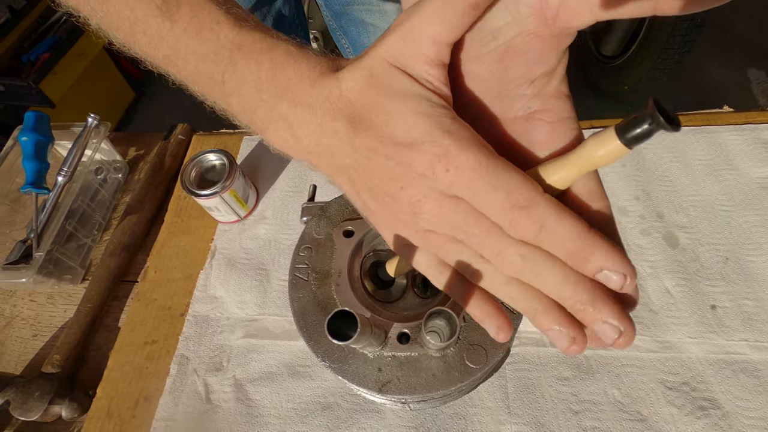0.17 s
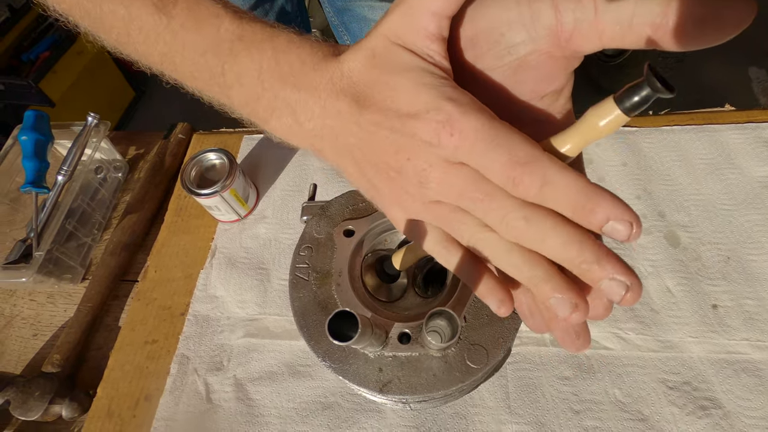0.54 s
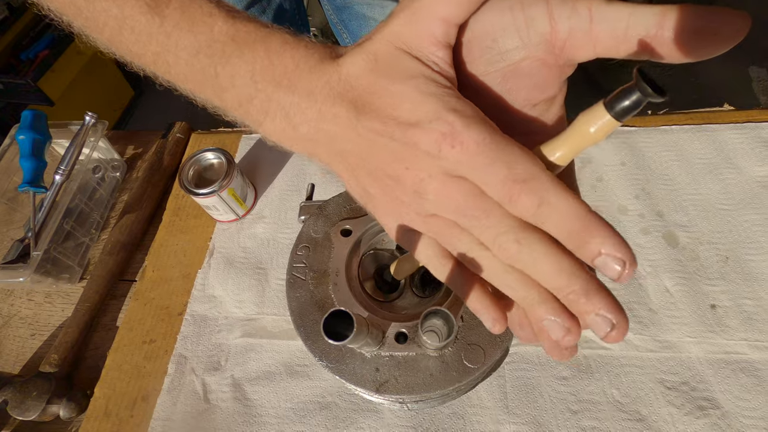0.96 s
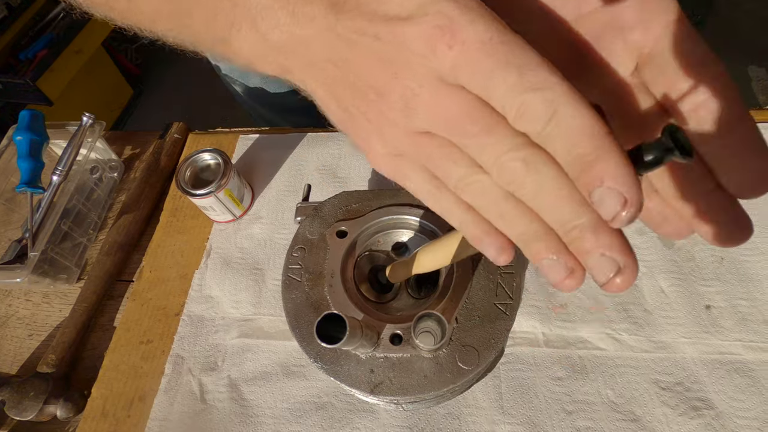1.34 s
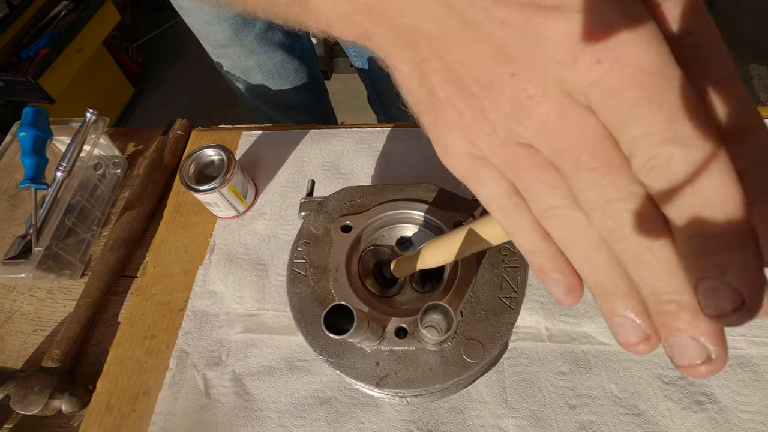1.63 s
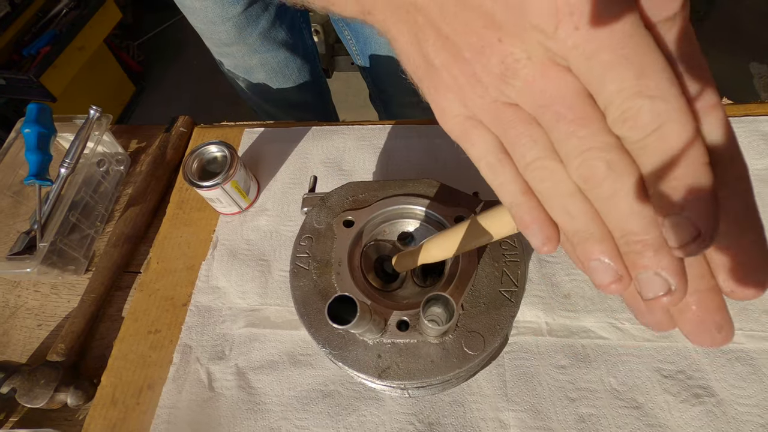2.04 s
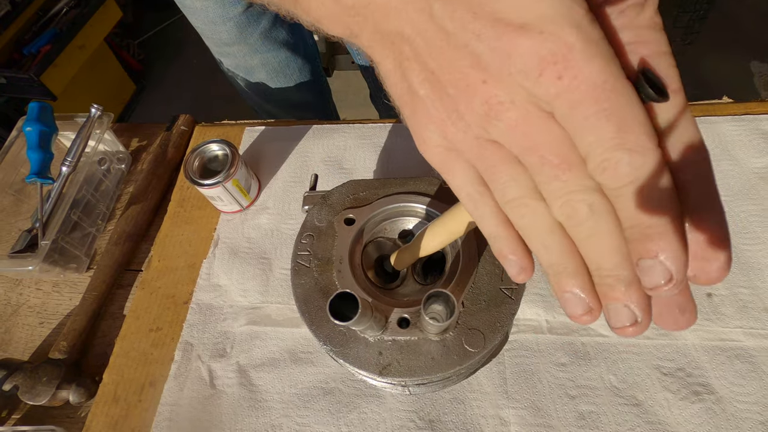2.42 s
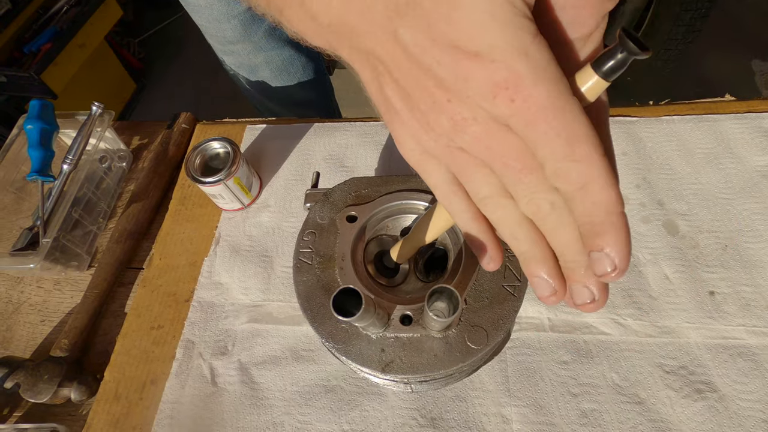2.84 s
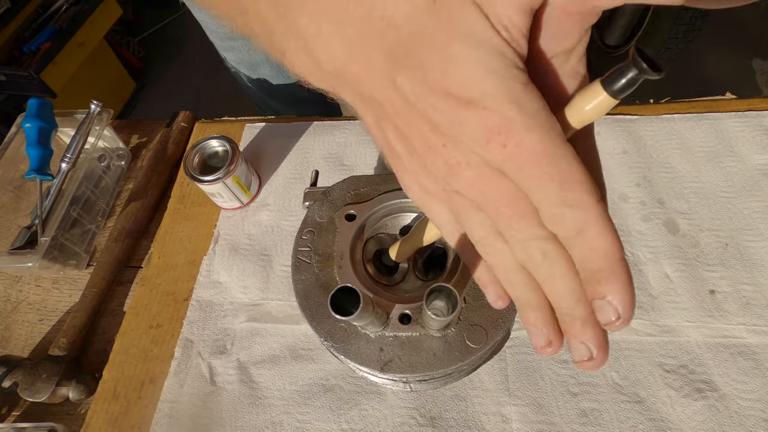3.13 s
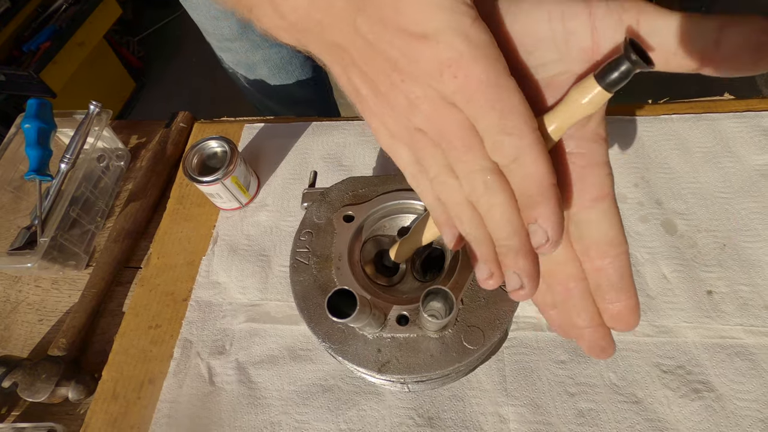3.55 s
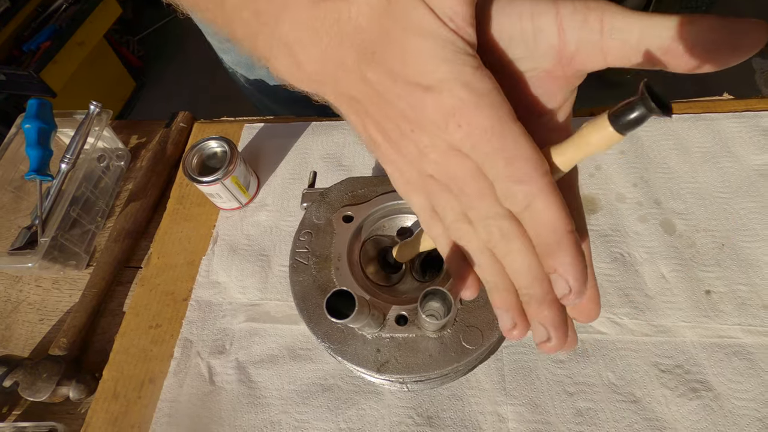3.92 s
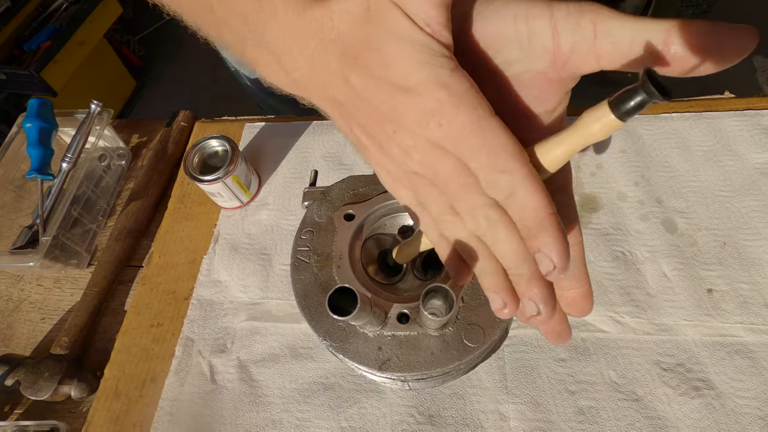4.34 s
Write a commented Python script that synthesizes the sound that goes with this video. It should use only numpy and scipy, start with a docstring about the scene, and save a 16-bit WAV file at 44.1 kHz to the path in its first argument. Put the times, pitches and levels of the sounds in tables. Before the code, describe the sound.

A valve is ground against its seat in a metal cylinder head with a wooden stick spun between two palms, heard from close above the workbench. In the first half second come three short, gritty scrapes that make the metal ring, along with a soft, dull scuff of skin on wood. From about 0.5 to 1.7 seconds the grinding pauses: stray grains tick faintly and the rubbing of the hands fades away. Near 1.8 seconds the turns resume, short and uneven at first. From about 2.6 seconds they build into louder, steady back-and-forth strokes, about seven a second, continuing to the end at around 4.5 seconds. Each stroke is a sandy rasp with a bright sizzle and a thin metallic ring, and the valve often catches with a brief, mid-pitched chatter. The workshop adds a short, dull echo and a quiet low rumble throughout.

```python
"""A wooden lapping stick, spun to and fro between two palms, grinds a valve on its seat in a cylinder head.
First come a few hesitant turns: crushed grit rasps and rings the metal, and skin scuffs the shaft.
In the pause that follows, stray grains tick as the hands shift their grip. Near 2 s the turns resume and
build to steady strokes, about seven a second, the valve catching and chattering on its lowest mode.
The workshop rumbles quietly throughout."""
import sys
import numpy as np
from scipy import signal
from scipy.fft import rfft, irfft, next_fast_len
from scipy.io import wavfile
from scipy.ndimage import uniform_filter1d

SR = 44100
rng = np.random.default_rng(int(sys.argv[2]) if len(sys.argv) > 2 else 0)


def inscribe(sig):
    """Save sig as 16-bit PCM at rate SR to the path in sys.argv[1].

    A 1-D sig is mono; a 2-D sig holds one channel per row.
    Samples are clipped to [-1, 1] before scaling.
    """
    pcm = np.round(np.clip(np.atleast_2d(sig).T, -1, 1) * 32767)
    wavfile.write(sys.argv[1], SR, pcm.astype(np.int16))


N = 197423
TIME = np.arange(N) / SR
FFT_SIZE = 2 * next_fast_len(N)
FREQ = np.maximum(np.arange(FFT_SIZE // 2 + 1) * SR / FFT_SIZE, 1)


# EQ of the fine grit's sizzle: (frequency [Hz], gain [dB])
GRIT_EQ = [(2500, -29.5), (4500, -17), (5600, -15), (6400, -6.5), (7300, -3.5), (8400, -5), (9400, 4),
           (9900, -1.5), (10600, -4), (11100, 1), (11600, -11), (12500, -9), (13200, -32), (15700, -28)]
# EQ of the coarse rasp: (frequency [Hz], gain [dB])
RASP_EQ = [(700, -25), (950, 0.5), (1150, 1.5), (1400, -6), (1700, -1), (2150, -2), (2650, -3.5),
           (2900, -9), (3300, -6), (4000, -14.5), (4700, -13.5), (6200, -13), (8000, -16), (11000, -28.5)]
def grinding(fine, coarse):
    """Grit rolls and breaks between valve and seat and rings the metal."""
    body = metal()
    judder = undb(1.4 * walk(rate=170))  # the paste grips unevenly
    grit = through(fine * judder * grains(per_s=6000, spread_db=0), unit(colour(GRIT_EQ) * body))
    rasp = through(coarse * judder * grains(per_s=3000, spread_db=2.0), unit(colour(RASP_EQ) * body))
    return undb(-1.9) * grit + undb(1.26) * rasp


# Resonances of valve and head: (frequency [Hz], width [Hz], gain over the broad spectrum [dB])
METAL_MODES = [(1808, 40, 5), (2005, 37, 8), (2183, 77, 6), (2237, 14, 9), (2330, 20, 5), (2515, 35, 8),
               (2702, 92, 5), (3136, 240, 4), (3351, 51, 10), (3711, 113, 10), (4077, 27, 20),
               (4259, 14, 8), (4406, 20, 15), (4564, 163, 11), (5151, 82, 5), (5704, 164, 4), (6318, 75, 2),
               (6868, 97, 16), (7312, 21, 9), (7571, 133, 8), (8023, 154, 6), (8469, 370, 7),
               (9303, 112, 3), (9596, 30, 6), (10215, 30, 4), (12050, 80, 0), (12680, 80, 3)]
def metal():
    """The metal's response: strong modes ring, and countless weak ones add a brief shimmer."""
    ring = 1 + sum(undb(db) * mode(hz, width) for hz, width, db in METAL_MODES)
    shimmer = unit(rfft(tail(t60_s=.06), FFT_SIZE))
    return ring * (1 + undb(-11) * shimmer)


# Strokes of the palms: (start [s], length [s], fastest point [share of length], grit drive [dB],
# rasp drive over grit [dB], chatter drive on breaking free [dB])
PALM_STROKES = [ (0.0, 0.11, 0.087, -54, -1, -37.5), (0.15, 0.13, 0.43, -55.5, 0, -31.5),
                (.296, 0.11, 0.3, -53, -1, -34.5), (1.767, 0.065, .35, -54.5, -4.5, -38),
                (1.932, 0.043, 0.81, -53, -5, -53), (2.004, 0.091, 0.2, -47, -4, -24.5),
                (2.111, .026, 0.48, -49, -2, -30), (2.256, 0.17, 0.42, -49, -4, -44),
                (2.556, 0.17, 0.43, -44.5, -3, -30.5), (2.741, 0.063, 0.29, -46, -2.5, -35),
                (2.817, 0.084, 0.32, -47, 1.5, -42), (2.914, .16, 0.52, -45, 0, -50),
                (3.076, 0.16, 0.59, -45.5, 2, -25.5), (3.239, 0.14, 0.4, -43.5, 2.5, -31),
                (3.388, .142, 0.52, -47.5, 4.5, -27), (3.535, 0.12, 0.38, -42.5, 2.5, -23),
                (3.663, 0.15, 0.47, -45, 3.5, -29), (3.818, 0.12, 0.48, -44, 4.5, -24.5),
                (3.961, 0.15, 0.31, -45.5, 3, -39.5), (4.115, 0.13, .48, -46, 4.5, -25.5),
                (4.263, 0.17, 0.29, -47, 3, -28.5), (4.428, 0.11, 0.39, -46.5, 2, -28)]
def strokes(attack_s=.004, release_s=0.0074):
    """Grit and rasp envelopes: the stick jerks free, speeds up and slows to each reversal."""
    fine, coarse = np.zeros(N), np.zeros(N)
    for start, length, fastest, grit_db, rasp_db, _ in PALM_STROKES:
        now = (TIME >= start) & (TIME < start + length + 10 * release_s)
        age = TIME[now] - start
        arc = np.sin(np.pi * np.interp(age / length, [0, np.clip(fastest, .1, .9), 1], [0, .5, 1]))
        edge_speed = np.interp(age, [0, length], [0.34, 0.098])  # shares of the top speed
        speed = arc + (1 - arc) * edge_speed
        turning = np.minimum(age / attack_s, 1) * np.exp(-np.maximum(age - length, 0) / release_s)
        fine[now] += undb(grit_db) * turning * speed ** 1.08
        coarse[now] += undb(grit_db + rasp_db) * turning * speed ** 1.44
    return fine, coarse


def travel(x, depth_db, rate):
    """The contact wanders round the seat, so nine bands swell and fade, each on its own."""
    centres = np.log(np.geomspace(1000, 13000, num=9))
    bands = (np.interp(np.log(FREQ), centres, row) for row in np.eye(len(centres)))
    spectrum = rfft(x, FFT_SIZE)
    return sum(irfft(spectrum * band)[:N] * undb(depth_db * walk(rate)) for band in bands)


VALVE_HZ, VALVE_WIDTH_HZ = 717.8, 25.5
def chatter(load, rise_s, wander):
    """At each catch, stick-slip pumps the valve's lowest mode for a few cycles and lets it die."""
    envelope = np.zeros(N)
    for start, db in catches(load):
        near = slice(*np.searchsorted(TIME, [start - rise_s, start + 20 * rise_s]))
        age = TIME[near] - start
        choke = 1 - 0.36 * np.exp(-(age / 0.0023) ** 2)  # an instant of sticking damps the earlier ring
        envelope[near] = np.maximum(envelope[near] * choke, undb(db) * swell(age, rise_s, sharp=1.31))
    hz = VALVE_HZ * (1 + wander * walk(rate=110))  # contact stiffness changes from grain to grain
    return undb(-1.0) * envelope * np.sin(2 * np.pi * np.cumsum(hz) / SR)


# Mid-stroke accents where the valve snags: (time [s], chatter drive [dB])
HARD_CATCHES = [(.027, -35), (.206, -31.5), (0.314, -30), (.343, -32), (1.774, -30.5), (1.787, -29.5),
                (1.952, -38), (2.01, -24.5), (2.053, -25), (2.118, -29), (2.309, -27.5), (2.337, -27.5),
                (2.598, -26), (2.769, -28.5), (2.837, -28), (2.954, -31), (2.992, -22.5), (3.028, -22),
                (3.27, -23.5), (3.309, -20.5), (3.349, -24), (3.44, -27), (3.456, -22.5), (3.576, -23.5),
                (3.62, -21.5), (3.721, -24), (3.837, -20), (3.898, -19), (3.987, -21.5), (4.004, -19),
                (4.155, -25.5), (4.186, -19.5), (4.317, -26.5)]
def catches(load, light_per_s=40):
    """Chatter triggers: stroke starts, hard catches, ticks and chance light ones that follow the load."""
    count = int(N / SR * light_per_s)
    jitter, size = rng.random((count, 2)).T
    times = (np.arange(count) + jitter) / light_per_s
    load_db = 20 * np.log10(np.interp(times, TIME, load) + 1e-9)
    light_db = -35.5 + load_db + 2 * (2 * size - 1)
    cued = [(row[0], row[-1]) for row in PALM_STROKES + HARD_CATCHES + GRAIN_TICKS]
    return sorted(cued + list(zip(times, light_db)))


def rocking(load):
    """Uneven drag rocks the valve in the head: midrange body with a narrow ring."""
    drag = load * grains(per_s=2500, spread_db=1.5)
    head = colour([(150, -63.5), (260, -15), (340, -11.0), (450, 0.5), (560, 1), (720, 5.5),
                   (900, -4.5), (1100, -15.5), (1500, -30.0)])
    ring = mode(VALVE_HZ, VALVE_WIDTH_HZ) * mode(VALVE_HZ, 190)
    return undb(-47.5) * unit(through(drag, head)) + undb(-44.0) * unit(through(drag, ring))


# Stray ticks: (time [s], grit drive [dB], chatter drive [dB])
GRAIN_TICKS = [(0.534, -60.5, -50), (0.592, -62.5, -54), (.608, -56, -47), (0.645, -64, -45),
               (0.672, -63, -54), (0.761, -68, -64), (.786, -66, -55), (.858, -56.5, -40),
               (.886, -59.5, -41.5), (1.034, -73, -52), (1.059, -63.5, -52), (1.157, -72.5, -62),
               (1.721, -62, -46.5), (1.878, -62, -62)]
def ticks():
    """Envelope of single grains cracking as the hands shift their grip."""
    return sum(undb(db) * swell(TIME - start, rise_s=0.0053) for start, db, _ in GRAIN_TICKS)


# Fader ride of the palms rubbing along the shaft: (time [s], level [dB])
PALM_RUB = [(0, -60.5), (.36, -57.5), (.5, -70.5), (.66, -65.5), (.81, -59.5), (0.949, -66.5), (1.33, -69),
            (1.5, -90)]
def palms():
    """Dry skin creeps on wood: a soft, dull scuff."""
    times, db = np.transpose(PALM_RUB)
    skin = colour([(120, -24), (280, 1.0), (420, 7), (540, 2.5), (800, -4.5), (1200, -11.0),
                   (2200, -11.5), (3500, -25.5), (7000, -31), (14000, -33)])
    grip_db = 2.3 * walk(rate=30)
    creep = grains(per_s=4000, spread_db=1.0) * undb(np.interp(TIME, times, db) + grip_db)
    return through(creep, unit(skin))


def room(x, t60_s, wet_db):
    """Bench and walls add a short, dull echo."""
    reflections = rfft(tail(t60_s) * (TIME > .004), FFT_SIZE)
    tone = colour([(300, -5.5), (700, -11.5), (2200, 2.0), (5000, -3.5), (10000, -8)])
    return x + undb(wet_db) * through(x, unit(reflections * tone))


# EQ of the workshop's room tone: (frequency [Hz], gain [dB])
WORKSHOP_EQ = [(20, -16), (50, -7.5), (72, -7), (95, -8), (150, -4.5), (240, -14), (400, -19), (700, -20.5),
               (1000, -28.5), (2000, -36.5), (4000, -40), (15000, -46.5)]
def workshop():
    """A steady bed of rumble with a low, wavering drone."""
    air = unit(through(rng.standard_normal(N), colour(WORKSHOP_EQ)))
    drone = unit(through(rng.standard_normal(N), mode(134, 33.4) ** 2 + mode(164.2, 29.0) ** 2))
    return undb(-63.5) * air + undb(-61.5) * drone


def grains(per_s, spread_db):
    """Friction crackle: dense random clicks at rms 1."""
    happens = rng.random(N) < per_s / SR
    size = undb(spread_db * np.minimum(rng.standard_normal(N), 2))
    return unit(happens * size * rng.choice([-1, 1], N))


def swell(age_s, rise_s, sharp=1):
    """A quick attack to 1 and a decay."""
    age = np.clip(age_s / rise_s, 0, 100)
    return (age * np.exp(1 - age)) ** sharp


def tail(t60_s):
    """Noise that dies away."""
    return rng.standard_normal(N) * undb(-60 * TIME / t60_s)


def walk(rate):
    """Smooth random modulation at rms 1, with `rate` new values a second."""
    hold = max(int(SR / rate), 1)
    steps = np.repeat(rng.standard_normal(N // hold + 1), hold)
    return unit(uniform_filter1d(steps, hold)[:N])


def mode(hz, width_hz):
    """Response of one resonance, gain 1 at its centre."""
    return 1 / (1 + 1j * (FREQ / hz - hz / FREQ) * hz / width_hz)


def colour(points):
    """Causal EQ curve through points of (frequency [Hz], gain [dB])."""
    hz, db = np.transpose(points)
    gain = undb(np.interp(np.log(FREQ), np.log(hz), db))
    cepstrum = irfft(np.log(gain))
    cepstrum[1:FFT_SIZE // 2] *= 2
    cepstrum[FFT_SIZE // 2 + 1:] = 0
    return np.exp(rfft(cepstrum))


def through(x, response):
    """Pass a signal through a frequency response."""
    return irfft(rfft(x, FFT_SIZE) * response)[:N]


def undb(db):
    """Decibels to gain."""
    return 10 ** (np.asarray(db) / 20)


def unit(x):
    """Scale to rms 1."""
    return x / np.sqrt(np.mean(np.abs(x) ** 2))


def scene():
    """The mono mix: the valve on its seat, heard from just above the bench."""
    fine, coarse = strokes()
    cracks = ticks()
    fine += undb(-3.5) * cracks
    coarse += undb(-6.0) * cracks
    load = unit((fine * coarse) ** 0.42)  # drag on the valve grows more slowly than the rasp
    valve = travel(grinding(fine, coarse), depth_db=1.22, rate=16)
    valve += rocking(load)
    valve += chatter(load, rise_s=0.0077, wander=0.017)
    return (room(valve, t60_s=0.33, wet_db=-13.5) + palms() + workshop())[None]


def record(dry):
    """A steep low-pass takes off the top end."""
    return signal.sosfilt(signal.ellip(12, .2, 70, 15750, fs=SR, output="sos"), dry)


dry = scene()
out = record(dry)
inscribe(out)
```